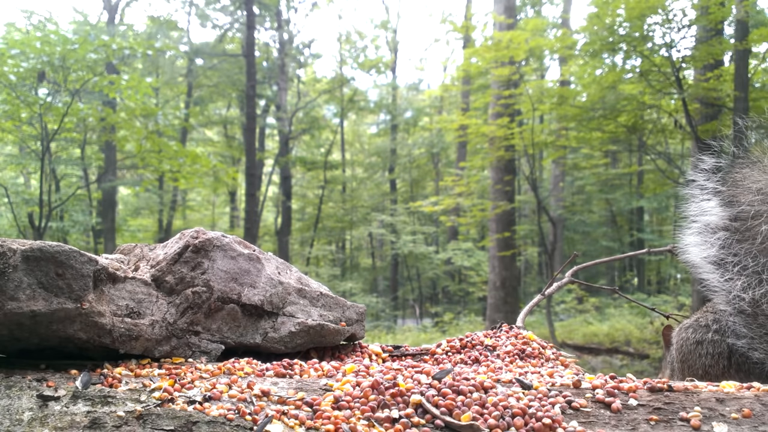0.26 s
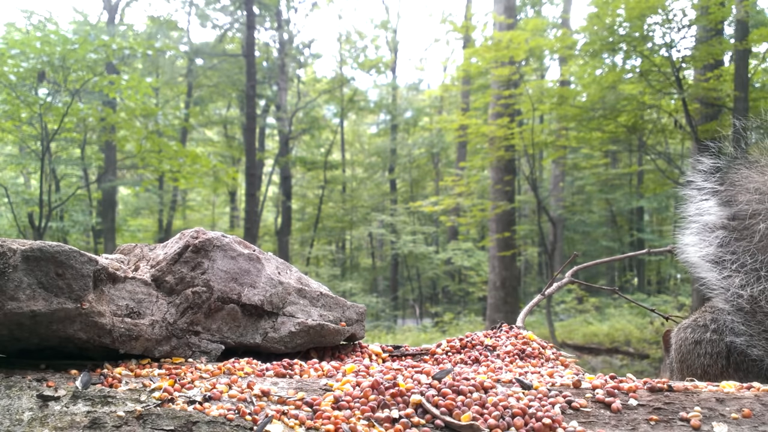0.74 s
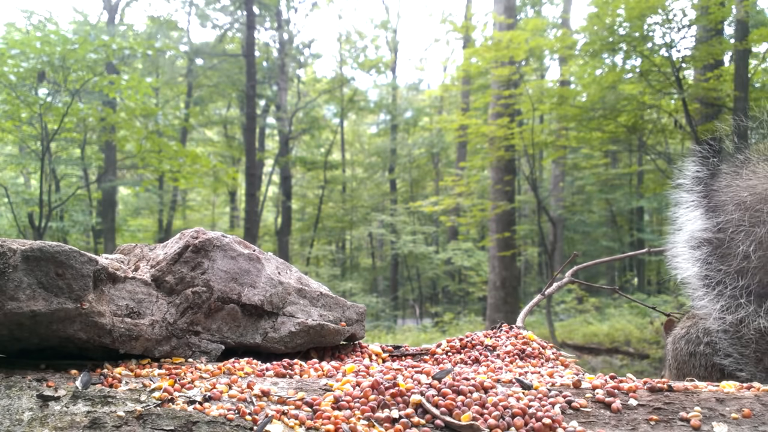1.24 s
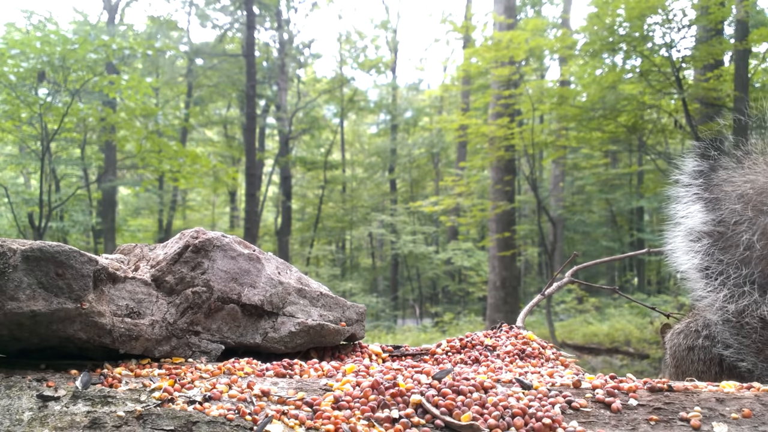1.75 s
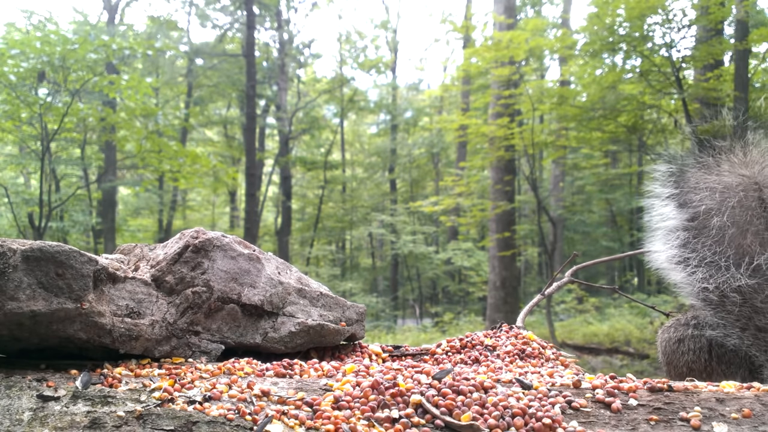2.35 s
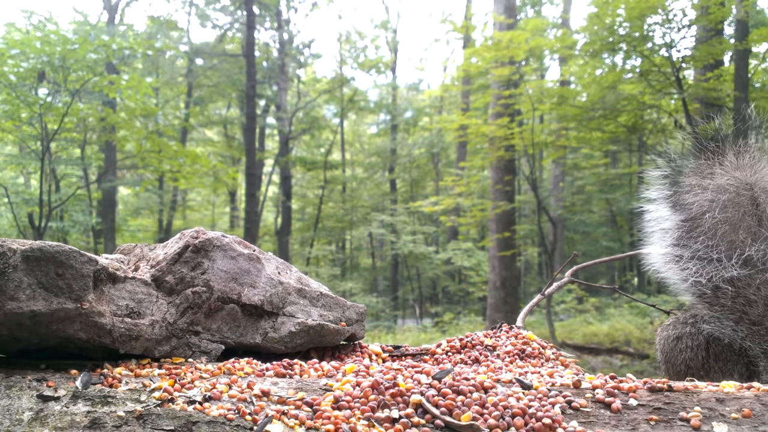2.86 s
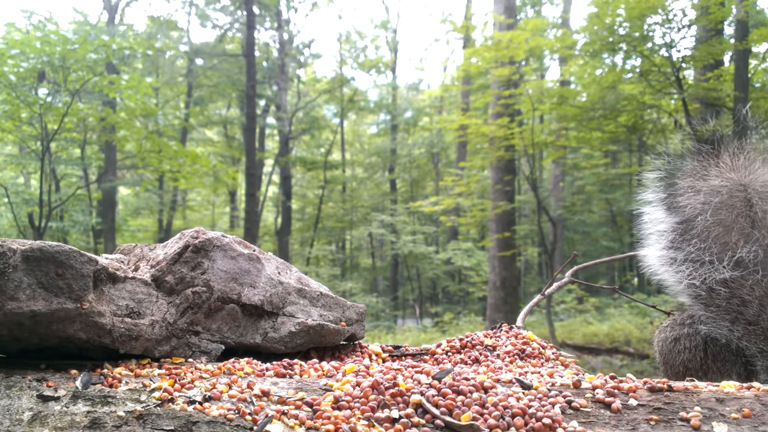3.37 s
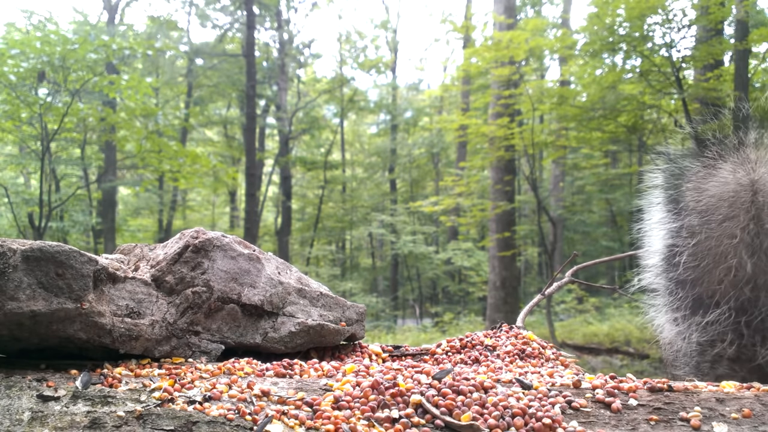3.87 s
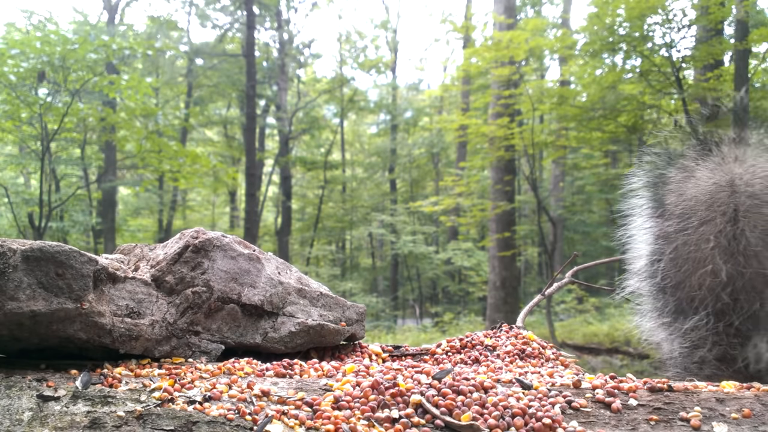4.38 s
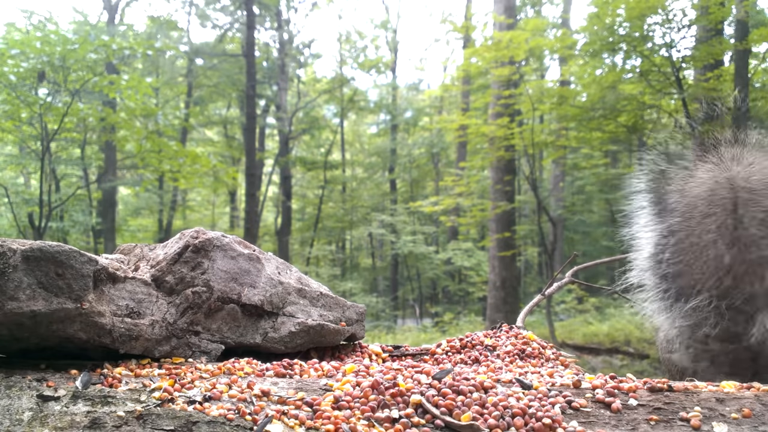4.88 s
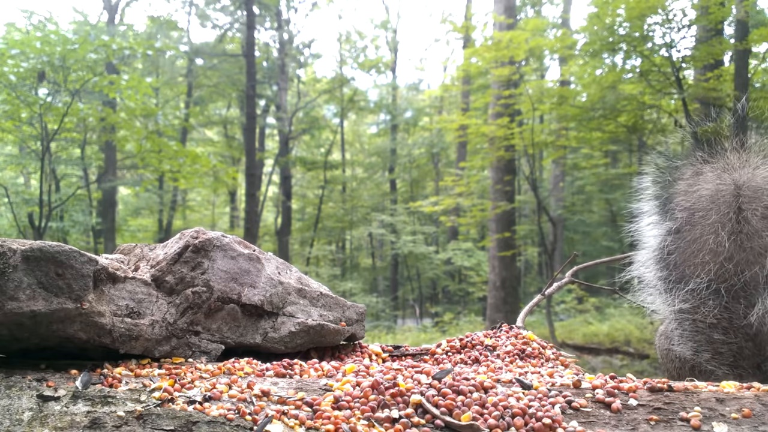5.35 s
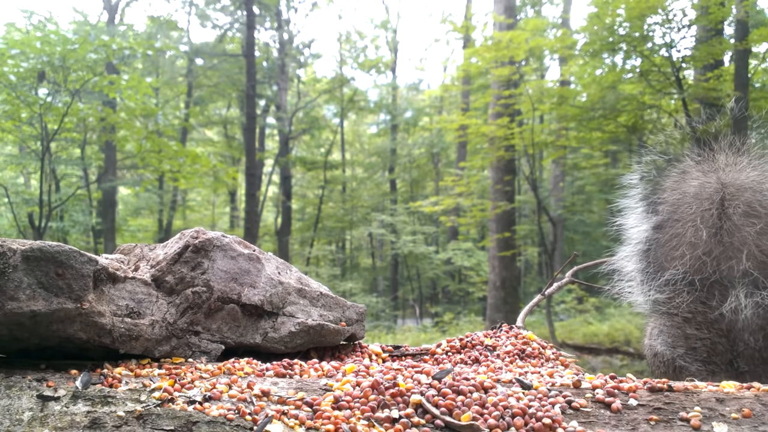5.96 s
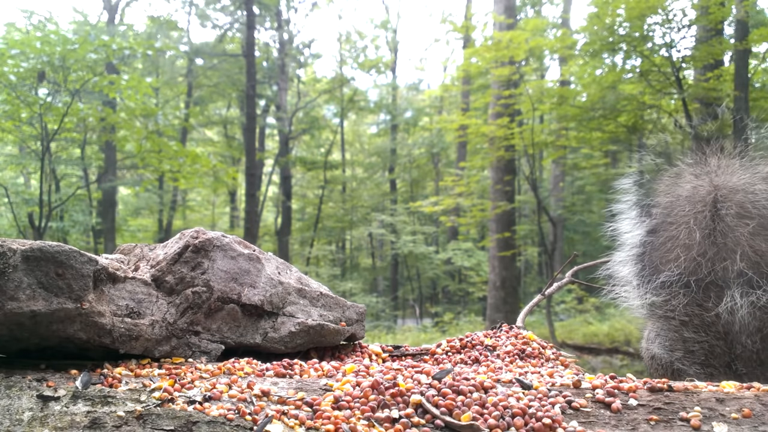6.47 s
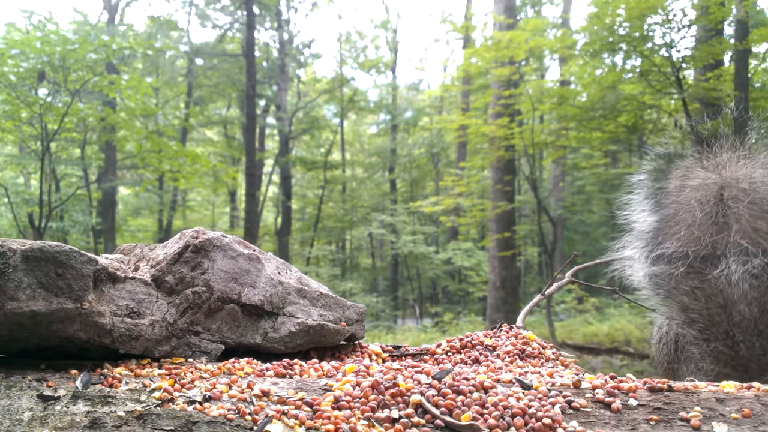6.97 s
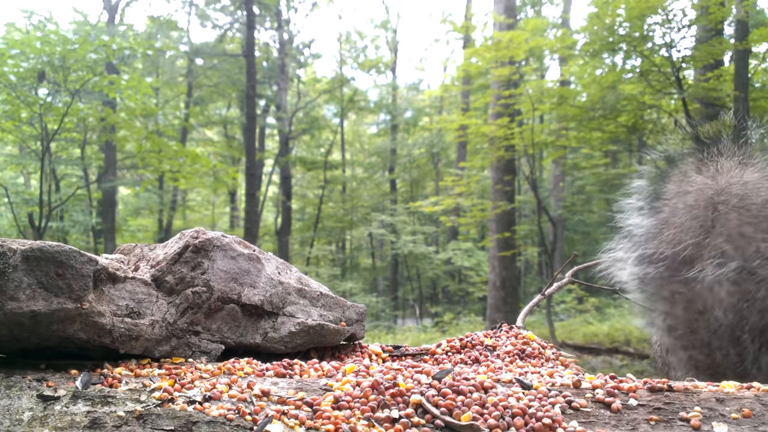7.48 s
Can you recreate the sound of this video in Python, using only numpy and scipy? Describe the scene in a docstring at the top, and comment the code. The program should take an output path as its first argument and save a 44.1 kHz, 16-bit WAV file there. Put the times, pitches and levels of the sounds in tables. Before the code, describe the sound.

A squirrel cracks and gnaws dry seed husks very close by in crisp crackling bursts, then pauses, leaving faint forest hush and a far engine hum.

```python
"""Crisp snaps of dry seed husks come first, close by: a squirrel cracks and chews on a feeding log in a wood.
Each snap is a cluster of tiny breaks ringing in husk resonances; gnawing and crumbs crackle as dense grains.
Filtered noise makes the dull chewing and soft scuffs; two damped sines make one paw thump on the log.
Behind lie two faint gliding bird notes and, from filtered noise, a thin insect chorus on the left and
the forest hush; a far engine hums in wavering harmonics over a low noise rumble."""
import sys
import numpy as np
from scipy import signal
from scipy.fft import rfft, irfft
from scipy.io import wavfile
from scipy.ndimage import uniform_filter1d

SR = 44100
rng = np.random.default_rng(int(sys.argv[2]) if len(sys.argv) > 2 else 0)


def put_to_file(sound):
    """Save the sound as 16-bit audio at rate SR, in the file named by the first command-line argument."""
    columns = np.atleast_2d(sound).T  # one column per channel
    safe = np.clip(columns, -1, 1)
    whole_steps = np.round(safe * 32767)
    wavfile.write(sys.argv[1], SR, whole_steps.astype(np.int16))


N = 340893
TIME = np.arange(N) / SR


def undb(db):
    """Decibels to gain."""
    return 10 ** (np.asarray(db) / 20)


def unit(x):
    """Scale to rms 1."""
    return x / np.sqrt(np.mean(x ** 2))


def curve(rows):
    """Join (s, value) rows by straight lines."""
    return np.interp(TIME, *np.transpose(rows))


def add(track, start_s, sound):
    """Mix a sound into a track at a given time."""
    i = max(int(start_s * SR), 0)
    track[..., i:i + sound.shape[-1]] += sound[..., :max(N - i, 0)]


def resonate(x, hz, width_hz):
    """Two-pole band-pass, gain 1 at the centre."""
    hz_limited = min(hz, .45 * SR)
    b, a = signal.iirpeak(hz_limited, hz / min(width_hz, SR / 4), fs=SR)
    return signal.lfilter(b, a, x)


def colour(x, hz, db, size=4096):
    """Minimum-phase filter with the given (Hz, dB) outline."""
    f = np.maximum(np.fft.rfftfreq(size, 1 / SR), 1)
    outline_db = np.interp(np.log(f), np.log(hz), db)
    # folding the cepstrum puts all the energy after the onset
    cepstrum = irfft(np.log(undb(outline_db)))
    cepstrum[1:size // 2] *= 2
    cepstrum[size // 2 + 1:] = 0
    response = irfft(np.exp(rfft(cepstrum)))
    return signal.oaconvolve(x, response)[:N]


def walk(rate):
    """Slow chance: random levels held 1 / rate s, smoothed twice, scaled to rms 1."""
    k = max(int(SR / rate), 1)
    held = np.repeat(rng.standard_normal(N // k + 1), k)
    smooth = uniform_filter1d(uniform_filter1d(held, k), k)
    return unit(smooth[:N])


def scatter(x, t60, db):
    """Dense fading reflections, different at each microphone."""
    t = TIME[:SR // 2]
    tails = rng.standard_normal((2, len(t))) * undb(-60 * t / t60)
    tails /= np.linalg.norm(tails, axis=1, keepdims=True)
    stereo = np.atleast_2d(x) * np.ones((2, 1))
    return undb(db) * signal.oaconvolve(stereo, tails, axes=1)[:, :N]


# the loudest husks snapping, levels over 4 ms ahead of the close-up gain and colour:
# start_s [s], level_db [dB], pitch_hz [Hz], width_hz [Hz]
HUSK_SNAPS = [(0.004, -32.5, 7100, 3880), (0.094, -43.5, 6600, 3000), (0.101, -40.5, 8500, 7450),
              (0.114, -37.5, 5250, 3020), (0.148, -26.5, 6080, 2300), (0.157, -38, 7050, 4000),
              (0.196, -43.5, 5600, 1710), (0.216, -37, 6200, 1700), (0.232, -35, 6000, 4000),
              (0.244, -45, 6860, 4000), (0.309, -42, 5150, 1710), (0.344, -41.5, 6200, 2310),
              (0.383, -35.5, 8850, 5900), (0.387, -42, 7540, 4000), (0.418, -37, 3620, 1700),
              (0.428, -27, 5600, 1710), (0.445, -43, 5800, 4000), (0.483, -40, 5400, 2980),
              (0.492, -28, 5050, 3020), (0.533, -34, 4770, 1700), (0.588, -33, 8100, 4000),
              (0.634, -41, 7100, 7500), (0.666, -39.5, 7800, 7500), (0.708, -40.5, 6060, 3000),
              (0.752, -41.5, 8400, 2980), (0.763, -44, 7400, 5500), (0.828, -30, 5800, 2920),
              (0.843, -47, 6400, 4020), (0.896, -40, 4180, 1200), (0.922, -42, 5860, 3000),
              (0.952, -38, 3660, 3000), (1.029, -47, 8800, 1720), (1.038, -42.5, 7650, 4060),
              (1.08, -50.5, 8460, 3000), (1.16, -51, 4200, 5000), (1.234, -53.5, 4300, 4000),
              (1.298, -49.5, 6500, 3000), (1.324, -52, 7000, 4000), (1.401, -38.5, 6900, 4000),
              (1.482, -48.5, 4570, 4000), (1.815, -44, 6300, 3020), (1.83, -42.5, 3580, 1200),
              (1.867, -32, 5200, 1200), (1.913, -42, 7100, 1700), (2.018, -47, 9500, 7500),
              (2.036, -40.5, 4040, 5360), (2.094, -56, 6900, 4000), (2.146, -49.5, 6100, 2300),
              (2.195, -39, 4450, 1710), (2.304, -35, 5850, 2300), (2.312, -37.5, 4960, 2300),
              (2.3831, -28.5, 5430, 1180), (2.397, -46, 5400, 2000), (2.474, -41.5, 7760, 5000),
              (2.499, -47, 8200, 7550), (2.552, -57, 7500, 3000), (2.673, -35, 6200, 2400),
              (2.686, -44, 6400, 4000), (2.713, -44, 7800, 2300), (2.756, -44, 4730, 2300),
              (2.81, -37, 5660, 4000), (2.858, -42.5, 4850, 2500), (2.909, -42, 6660, 7600),
              (2.9982, -33.5, 6200, 2600), (3, -31, 8000, 4000), (3.005, -28, 6050, 3000),
              (3.028, -38.5, 5760, 2300), (3.042, -31, 5800, 3000), (3.061, -39.5, 4100, 5500),
              (3.074, -42, 4280, 3500), (3.084, -47, 6800, 4000), (3.131, -45.5, 7740, 3000),
              (3.162, -31.5, 6700, 3980), (3.225, -37.5, 4500, 1680), (3.235, -39, 4100, 1680),
              (3.263, -34.5, 7060, 1700), (3.344, -43, 6400, 1200), (3.39, -44.5, 5650, 2300),
              (3.404, -44.5, 6200, 1200), (3.46, -51, 7840, 1200), (3.496, -51, 5770, 5000),
              (3.52, -46.5, 3460, 1000), (3.544, -44, 6530, 2500), (3.62, -45.5, 6600, 5000),
              (3.81, -54, 5600, 2500), (3.827, -52.5, 7500, 7500), (3.859, -57, 5400, 1500),
              (3.909, -48, 9250, 3000), (4.093, -54.5, 8400, 1200), (4.199, -48, 4900, 1700),
              (4.22, -40.5, 4430, 5000), (4.246, -56, 7500, 6000), (4.279, -58, 8050, 2500),
              (4.321, -51.5, 9000, 7500), (5.5672, -38, 3100, 3600), (5.847, -58, 4970, 2500),
              (5.873, -50, 6550, 2490), (7.504, -52, 6060, 3000)]


def snaps(spread_s=.001, splinter=0.71, apart=0.8, bounce_s=.0008, overtone=0.1, count=3, size=512):
    """Each snap is one clean break with a few splinters, ringing two modes of its own piece of husk."""
    out = np.zeros((2, N))
    for start_s, level_db, hz, width_hz in HUSK_SNAPS + nibbles():
        when = np.append(0, rng.random(count) * spread_s * SR).astype(int) % size
        # each splinter faces the two microphones differently
        splinters = splinter * (rng.standard_normal(count) + apart * rng.standard_normal((2, count)))
        breaks = np.column_stack([np.ones(2), splinters]) @ np.eye(size)[when]
        upper_hz = hz * rng.uniform(1.3, 1.8)
        snap = resonate(breaks, hz, width_hz)
        snap = snap + overtone * resonate(breaks, upper_hz, width_hz / 3)
        # the kernel inside gives a short, dull knock
        snap = snap + .13 * resonate(breaks, rng.uniform(800, 2200), 1400)
        # a bounce off the log, with its own random delay at each microphone, notches the snap
        bounced = []
        for side in snap:
            delay = int(bounce_s * SR * rng.uniform(.5, 1))
            bounced.append(side + .5 * np.roll(side, delay))
        snap = np.array(bounced)
        power = np.sum(snap ** 2, axis=1, keepdims=True) / (SR * .004)  # mean over 4 ms
        add(out, start_s, undb(level_db) * snap / np.sqrt(power))
    return out


def nibbles(above_db=1.5, spread_db=4.5, low_hz=3600, high_hz=9000, width_hz=2600, count=230):
    """Lesser snaps at random moments, their level following the gnawing: rows like HUSK_SNAPS."""
    moment, size, pitch, damping = rng.random((count, 4)).T
    when = (moment * N).astype(int)
    gnawing_db = 20 * np.log10(gnawing()[when])
    level_db = gnawing_db + above_db + spread_db * (2 * size - 1)
    pitch_hz = low_hz * (high_hz / low_hz) ** pitch
    return list(zip(when / SR, level_db, pitch_hz, width_hz * (.5 + damping)))


# bouts of gnawing and rummaging, in which crumbs crackle; the level is the one the sag starts from:
# start_s [s], length_s [s], level_db [dB]
GNAWING_BOUTS = [(0.097, 0.64, -50.5), (0.124, 0.024, -43.5), (0.264, 0.022, -43), (0.59, 0.035, -49.5),
                 (0.854, 0.083, -51), (1.046, 0.42, -60.5), (1.793, 0.15, -57), (2.056, 0.53, -58.5),
                 (2.262, 0.061, -51), (2.605, 0.74, -55.5), (2.945, 0.02, -46.5), (3.005, 0.034, -43),
                 (3.179, 0.036, -49.5), (3.274, 0.04, -47), (3.482, 0.088, -53.5), (3.6, 0.74, -65.5),
                 (3.895, 0.09, -63.5), (5.565, 0.025, -60), (5.846, 0.078, -65.5), (6.86, 0.07, -72),
                 (7.384, 0.19, -69)]
STIR_DB = -84  # faint stirring of the seeds, also between bouts
ATTACK_S, SAG_DB_PER_S, RELEASE_DB_PER_S = 0.013, 2, 142


def gnawing():
    """Strength of the gnawing: bouts set in quickly, slacken as the seed gives way, and die out."""
    power = np.full(N, undb(STIR_DB) ** 2)
    for start_s, length_s, level_db in GNAWING_BOUTS:
        t = TIME[:int((length_s + .5) * SR)]
        fall_db = SAG_DB_PER_S * t + RELEASE_DB_PER_S * np.maximum(t - length_s, 0)
        attack = np.minimum(t / ATTACK_S, 1)
        add(power, start_s, (attack * undb(level_db - fall_db)) ** 2)
    return np.sqrt(power)


# crumbs shed by a snap: level against the snap's listed level, and how fast they thin out
SHED_DB, SHED_DB_PER_S = -10.5, 418


def crumbling():
    """Strength of the crackle: the gnawing, and a short shower of crumbs after each of the loudest snaps."""
    power = gnawing() ** 2
    shower = undb(SHED_DB - SHED_DB_PER_S * TIME[:SR // 4])
    for start_s, level_db, *_ in HUSK_SNAPS:
        add(power, start_s, (undb(level_db) * shower) ** 2)
    return np.sqrt(power)


# around and below this strength the crackle tilts brighter; level of the dull kernel part
GENTLE_DB, GENTLE_DB_PER_OCTAVE, KERNEL_DB = -62, 7, -7


def crumbs(per_s=850, spread_db=2.7, clump_db=2.8, turn_db=1.8,
           low_hz=3700, high_hz=9800, width_hz=800, linger_s=.0018, count=11):
    """Dense tiny breaks, most faint and a few sharp; each sets off its own mix of husk resonances."""
    when = rng.integers(0, N, int(per_s * N / SR))
    sizes = undb(spread_db * np.minimum(rng.exponential(size=len(when)), 4.6))
    strength = crumbling()
    # gentle gnawing frees only the smallest crumbs, which sound higher
    gentle = 1 / (1 + strength / undb(GENTLE_DB))
    husk = 0
    for hz in np.geomspace(low_hz, high_hz, count):
        late = (rng.random(len(when)) * linger_s * SR).astype(int)
        shared, own = rng.standard_normal(len(when)), rng.standard_normal((2, len(when)))
        # as the seed turns in the paws, its resonances come and go
        tilt_db = GENTLE_DB_PER_OCTAVE * gentle * np.log2(hz / np.sqrt(low_hz * high_hz))
        turning = undb((clump_db * walk(50) + turn_db * walk(10) + tilt_db)[when])
        grains = np.zeros((2, N))
        grains[:, np.minimum(when + late, N - 1)] = sizes * turning * (shared + own)
        husk = husk + resonate(grains, hz, width_hz)
    # prompt, more even breaks join the top band's late grains and sound dully through the kernel
    grains[:, when] = np.sqrt(sizes) * (shared + own)
    kernel = resonate(np.tanh(grains / 2), 1300, 1960)
    return strength * (unit(husk) + undb(KERNEL_DB) * unit(kernel))


# resonances that hold back their part of every crunch, so that it sinks in pitch: pitch_hz [Hz], width_hz [Hz]
LATE_RINGS = [(3550, 520), (3950, 90), (4300, 750), (4900, 1200), (5600, 1600), (6500, 2800)]
# colour that every crunch takes on its way to each microphone: pitch_hz [Hz], left_db [dB], right_db [dB]
CLOSE_COLOUR = [(298, -30, -11.5), (1010, -16.5, -9), (1820, -22.5, -19.5), (2290, -7, -9.5),
                (3060, -17.5, -10.5), (3460, -2, -3), (4210, -5, -3), (5890, -1, -1), (6880, 2, -13),
                (7730, 0, -1), (8470, -0.5, -10), (10900, -6, -7)]


def feeding(snap_db=4.5, scatter_db=-13, trees_db=-23):
    """Snaps and crumbs, scattered by the seed pile and the rocks and faintly by the trees."""
    dry = undb(snap_db) * snaps() + crumbs()
    for hz, width_hz in LATE_RINGS:
        # all-pass: the treble arrives first, a thin ring near 4 kHz last
        dry = dry - 2 * resonate(dry, hz, width_hz)
    pile = scatter(dry, t60=.02, db=scatter_db)
    trees = scatter(dry, t60=.2, db=trees_db)
    hz, *sides_db = np.transpose(CLOSE_COLOUR)
    return np.array([colour(x, hz, db) for x, db in zip(dry + pile + trees, sides_db)])


# soft, dull ticks of chewing, rms at the onset ahead of the trim: start_s [s], level_db [dB]
CHEW_TICKS = [(1.573, -60), (1.6335, -50), (1.639, -52), (1.682, -55), (1.7143, -50), (1.767, -56.5),
              (2.409, -55), (2.42, -55), (2.432, -51), (2.454, -55), (2.499, -47.5), (2.518, -53)]
# resonances of the chewing: pitch_hz [Hz], width_hz [Hz], share [gain]
JAW_RESONANCES = [(2130, 350, 1), (1570, 960, 0.66)]


def chewing(t60=.028, trim_db=-3.0):
    """Muffled ticks: fading noise in two broad resonances."""
    out, t = np.zeros((2, N)), TIME[:SR // 20]
    for start_s, level_db in CHEW_TICKS:
        grind = rng.standard_normal(len(t)) + .5 * rng.standard_normal((2, len(t)))
        body = 0
        for hz, width_hz, share in JAW_RESONANCES:
            body = body + share * resonate(resonate(grind, hz, width_hz), hz, width_hz)
        add(out, start_s, undb(level_db + trim_db - 60 * t / t60) * unit(body))
    return out


# the two tones of the thump, levels ahead of rise and decay: start_s [s], level_db [dB], pitch_hz [Hz], t60_s [s]
LOG_TONES = [(4.221, -35, 270, 0.022), (4.2218, -40, 487, 0.014)]


def knocks(rise_s=0.00046, lowest_hz=170):
    """A soft blow on damp wood, gone in a few cycles; the log gives off little deep bass."""
    out, t = np.zeros(N), TIME[:SR // 10]
    push = 1 - np.exp(-(t / rise_s) ** 2)
    for start_s, level_db, hz, t60 in LOG_TONES:
        add(out, start_s, -np.sin(2 * np.pi * hz * t) * push * undb(level_db - 60 * t / t60))
    out = signal.sosfilt(signal.butter(2, lowest_hz, "high", fs=SR, output="sos"), out)
    return out + scatter(out, t60=.1, db=-22)


# faint scuffs on the log, noise rms ahead of the swell, which peaks at half: start_s [s], level_db [dB]
LOG_SCUFFS = [(5.506, -55.5), (6.225, -57.5)]


def scuffs(hz=900, width_hz=400, rise_s=0.01):
    """Soft, dull rubs of band-passed noise that swell quickly and fade with a longer tail."""
    out, t = np.zeros((2, N)), TIME[:SR // 2] / rise_s
    swell = t / (1 + t ** 2)
    for start_s, level_db in LOG_SCUFFS:
        rub = resonate(resonate(rng.standard_normal((2, len(t))), hz, width_hz), hz, width_hz)
        add(out, start_s, undb(level_db) * swell * unit(rub))
    return out


# bird notes, peak ahead of the reflections:
# start_s [s], length_s [s], start_hz [Hz], end_hz [Hz], level_db [dB]
BIRD_NOTES = [(3.548, .05, 1340, 1360, -63), (7.468, .04, 7700, 7200, -55)]


def birds():
    """Short gliding whistles that linger among the trunks."""
    out = np.zeros(N)
    for start_s, length_s, start_hz, end_hz, level_db in BIRD_NOTES:
        hz = np.linspace(start_hz, end_hz, int(length_s * SR))
        whistle = np.sin(2 * np.pi * np.cumsum(hz) / SR)
        add(out, start_s, undb(level_db) * np.hanning(len(hz)) * whistle)
    return out + scatter(out, t60=.45, db=-3)


def insects(hz=8150, width_hz=600, lowest_db=-75, swell_db=9.5, period_s=1.9, crest_s=6.01):
    """A thin chorus of band-passed noise on the left that swells and sinks slowly."""
    swell = np.cos(np.pi * (TIME - crest_s) / period_s) ** 2
    shrill = unit(resonate(rng.standard_normal(N), hz, width_hz))
    left = undb(lowest_db + swell_db * swell ** 2 + .5 * walk(10)) * shrill
    return np.array([left, np.zeros(N)])


# outline of forest hush and microphone hiss, relative density: pitch_hz [Hz], level_db [dB per Hz]
HUSH_OUTLINE = [(25, -13), (55, -19), (90, -4), (120, -14), (200, -9.5), (400, -12.5), (950, -17),
                (1400, -21), (2500, -24), (5500, -26), (10400, -25)]
# slow swell of the forest, added to HUSH_DB: start_s [s], level_db [dB]
FOREST_SWELL = [(0, 7), (1.5, 5.5), (3.4, 6.5), (4.7, 3.5), (7.7, 6)]
HUSH_DB = -70.5  # rms of the part both microphones share, ahead of the swell


def forest(alike_hz=750, bass_apart=0.58):
    """Even noise hush, more alike in the bass and unrelated in the treble; it flutters near 850 Hz."""
    hz, db = np.transpose(HUSH_OUTLINE)
    likeness = (1 - bass_apart ** 2) / (1 + (hz / alike_hz) ** 2)
    side_db = db + 10 * np.log10((1 - likeness) / (1 + likeness))
    mid = colour(rng.standard_normal(N), hz, db)
    side = colour(rng.standard_normal(N), hz, side_db)
    level = undb(HUSH_DB + curve(FOREST_SWELL))
    hush = np.array([mid + side, mid - side]) / np.std(mid) * level
    flutter_level = undb(-83 + 4 * walk(12))
    flutter = flutter_level * unit(resonate(rng.standard_normal((2, N)), 850, 300))
    return hush + flutter


# far engine, rms ahead of waver and slow level: harmonic [multiple of HUM_HZ], level_db [dB]
HUM_HARMONICS = [(1, -81), (2, -77), (3, -80)]
# the hum grows while a lower rumble sinks, then partly returns: start_s [s], hum_db [dB gain], rumble_db [dB rms]
ENGINE_LEVELS = [(0, -8, -77), (3.4, -2, -83), (4.5, -2, -92), (7.7, 0, -84)]
HUM_HZ = 88.4


def engine(drift=0.005, waver_db=3.5, rumble_hz=77, rumble_width_hz=20):
    """A far engine hums in drifting harmonics through the trees, over a noise rumble of traffic."""
    rows = np.array(ENGINE_LEVELS)
    hum_db, rumble_db = curve(rows[:, :2]), curve(rows[:, ::2])
    phase = 2 * np.pi * np.cumsum(HUM_HZ * (1 + drift * walk(3.86))) / SR
    hum = 0
    for harmonic, level_db in HUM_HARMONICS:
        level = np.sqrt(2) * undb(level_db + waver_db * walk(7))
        hum = hum + level * np.sin(round(harmonic) * phase)
    rumble = resonate(rng.standard_normal(N), rumble_hz, rumble_width_hz)
    return undb(hum_db) * hum + undb(rumble_db) * unit(rumble)


def scene():
    """The squirrel in front, the wood behind."""
    squirrel = feeding() + chewing() + knocks() + scuffs()
    return squirrel + birds() + insects() + forest() + engine()


TOP_HZ = 10550


def record(dry):
    """Nothing sounds much above 10.5 kHz: a tenth-order elliptic low-pass."""
    return signal.sosfilt(signal.ellip(10, .2, 65, TOP_HZ, fs=SR, output="sos"), dry)


dry = scene()
out = record(dry)
put_to_file(out)
```